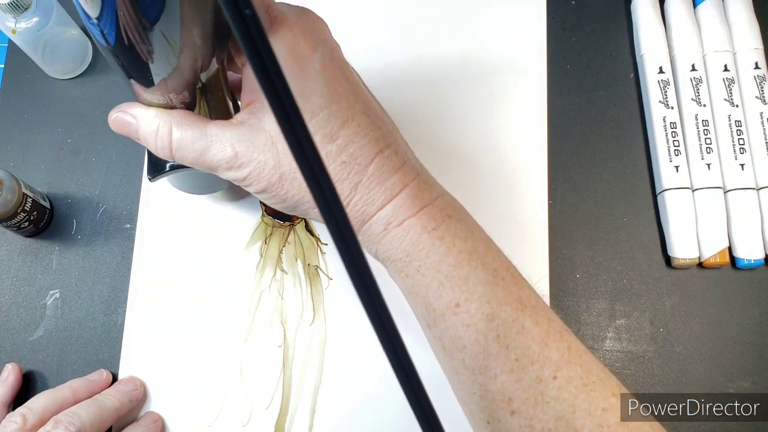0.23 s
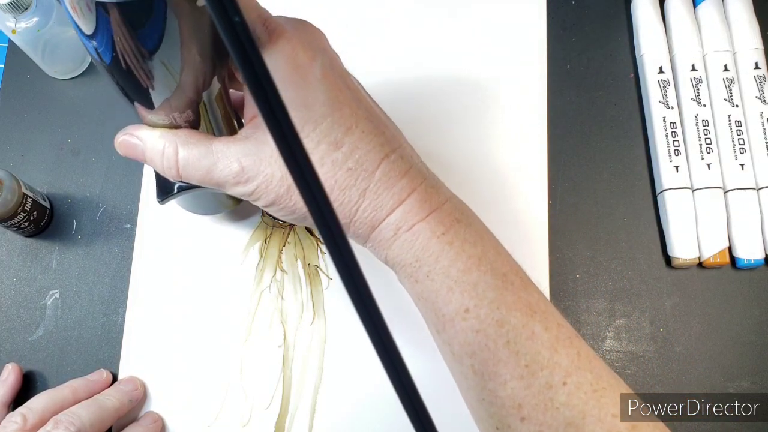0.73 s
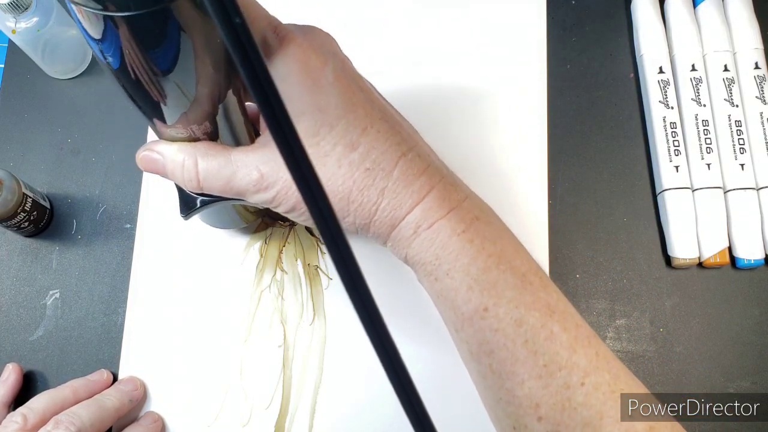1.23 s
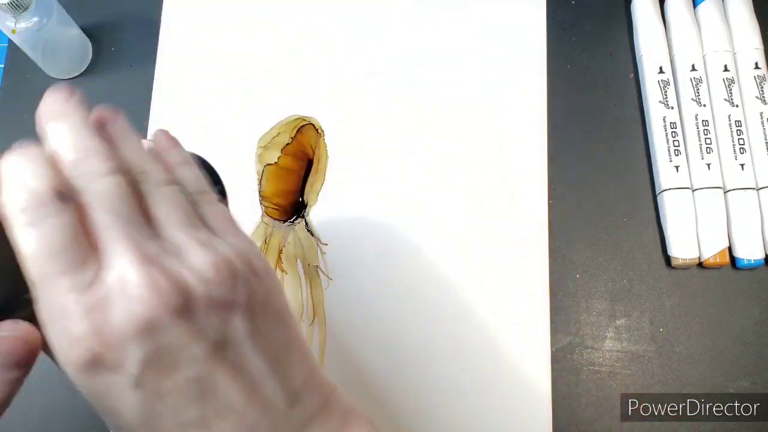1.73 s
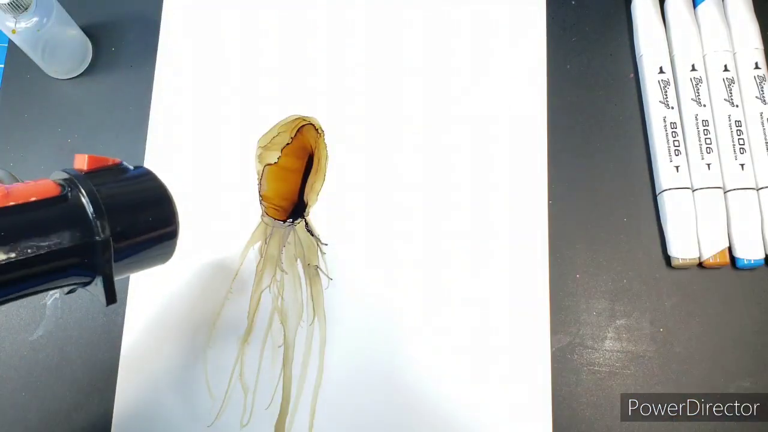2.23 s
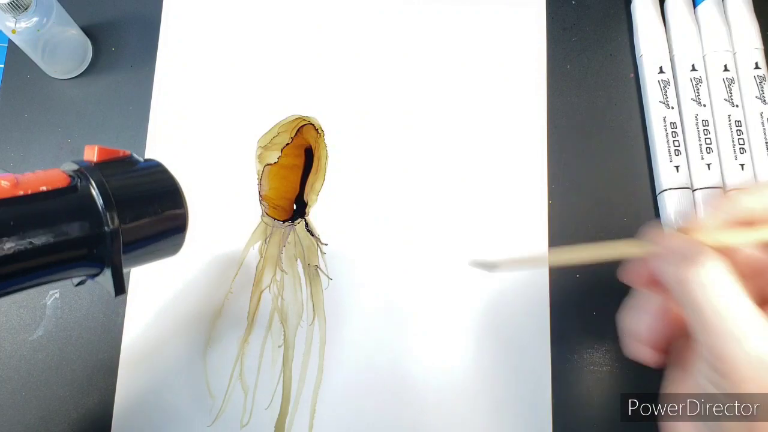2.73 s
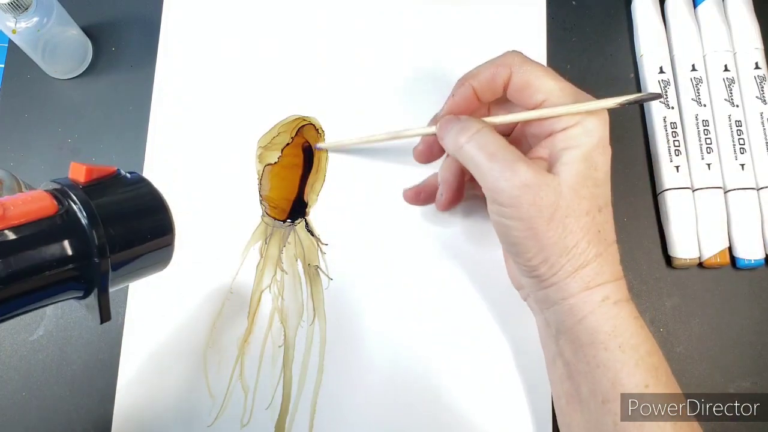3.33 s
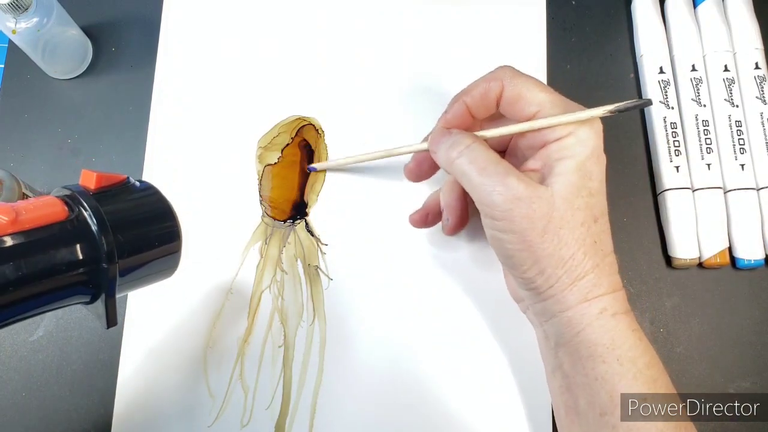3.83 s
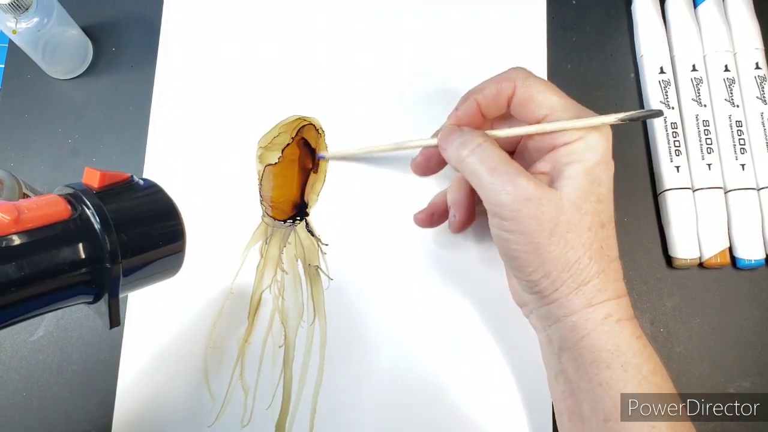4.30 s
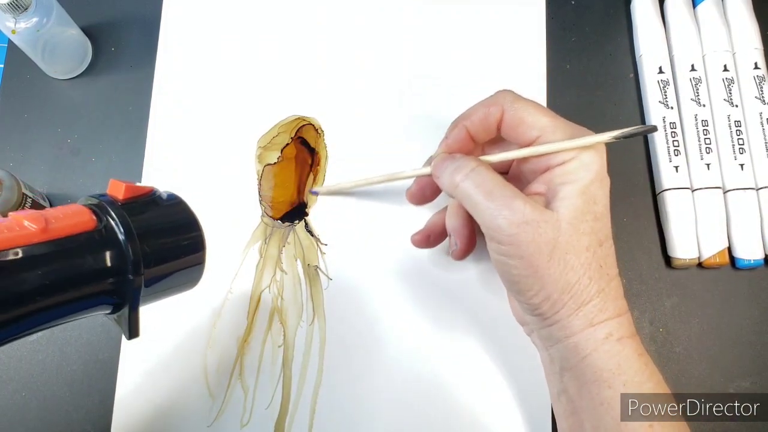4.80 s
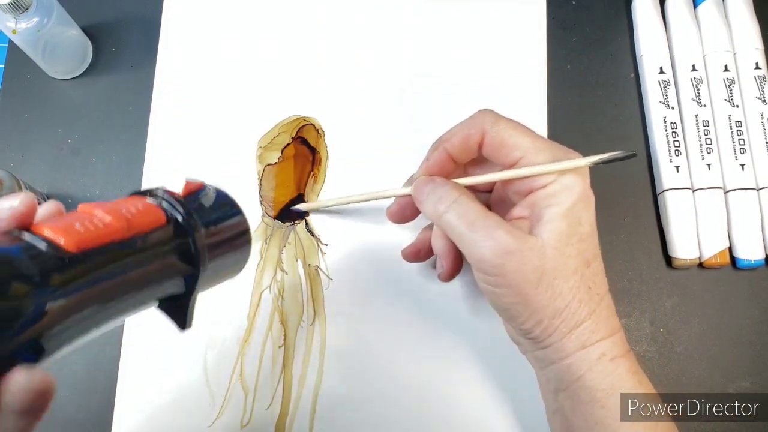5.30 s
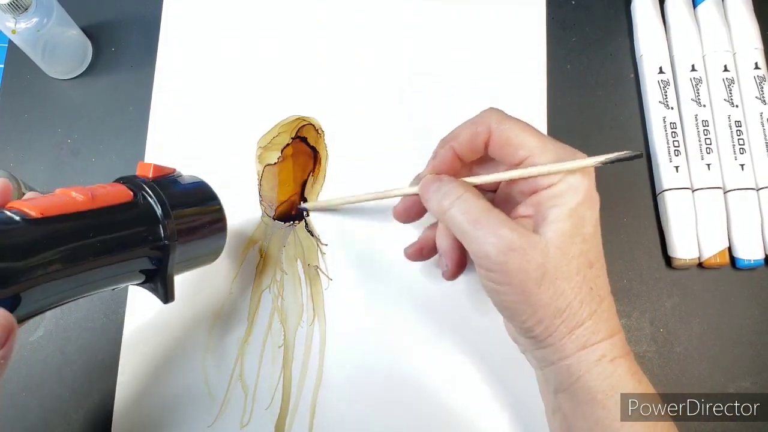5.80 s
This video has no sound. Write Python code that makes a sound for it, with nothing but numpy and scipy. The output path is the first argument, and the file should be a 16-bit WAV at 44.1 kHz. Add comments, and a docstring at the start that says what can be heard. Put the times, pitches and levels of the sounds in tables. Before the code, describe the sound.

Continuous close blow dryer noise in a small dry room: low barrel roar, dense airy hiss, and a reedy fan whine with a slight electrical buzz. The tone changes as the nozzle leaves the paper, with a soft sweep. Soon after come a light desk knock and a sharp wood-on-plastic tick, slightly to the right. The blowing continues to the end, with small flutters and another gentle sweep as it tilts.

```python
"""At a desk, a small hand-held dryer blows over a sheet of paper, close to a two-port microphone.
It points straight down at first, then is swung aside and later tilted up. Turbulent air roars in the
barrel and hisses at the nozzle, as shaped noise; the fan whines in sine tones on multiples of its shaft
speed, which ripples with the mains. A hand bumps the desk and picks up a paintbrush with one sharp click:
noise ticks over decaying desk modes."""
import sys
import numpy as np
from scipy import signal
from scipy.fft import rfft, irfft
from scipy.io import wavfile
from scipy.ndimage import uniform_filter1d, map_coordinates

SR = 44100
rng = np.random.default_rng(int(sys.argv[2]) if len(sys.argv) > 2 else 0)


def log_audio(samples):
    """Write samples as a 16-bit WAV file to the path given in sys.argv[1]."""
    # one column per channel
    frames = np.atleast_2d(samples).T
    # limit to full scale, then quantise
    limited = np.clip(frames, -1, 1)
    pcm = np.round(limited * 32767).astype(np.int16)
    wavfile.write(sys.argv[1], SR, pcm)


N = 266849

# turbulent air, base spectrum: (frequency [Hz], density pointing down [dB per Hz], aside [dB per Hz])
AIR_SPECTRUM = [(25, -99, -94), (38, -109, -104), (56, -73.5, -83), (95, -89, -89.5), (190, -88, -84.5),
                (282, -84, -86), (642, -82, -79.5), (1400, -85, -86), (2930, -79.5, -80.5),
                (3100, -82.5, -81.5), (4700, -85, -87.5), (6000, -84.5, -86), (9160, -86.5, -91),
                (13300, -89, -91.5), (15300, -83.5, -87.5)]
# resonances of barrel, grille and desk:
# (frequency [Hz], width [Hz], lift pointing down [dB], lift aside [dB])
RESONANCES = [(127.6, 39, 6, 5.5), (306, 65, 6.5, 8), (406.6, 13, 10, 12), (520, 75, 5.5, 4),
              (771, 64, 14, -1), (858.7, 111.6, 15.5, 22.5), (991, 193, 11.5, 1.5), (1061, 177, 2, 14),
              (1600, 444, 8, 4.5), (1756, 87, -1, 3.5), (2006, 78, 5.5, 5.5), (2310, 35, 8.5, 5.5),
              (3816, 113, -1.5, 11), (4830, 83, 5.5, 6), (7250, 680, 1, 5.5), (7830, 260, -1.5, 3.5),
              (8300, 210, -0.5, 4.5), (11400, 3900, 6.5, 7)]
# the colour of the air shifts as the hands move:
# (middle time [s], length [s], frequency [Hz], width [Hz], change [dB])
COLOUR_SHIFTS = [(2.54, 0.75, 640, 220, 4), (6.6, .8, 640, 170, 2.5), (3.8, 1.8, 894, 88, -5.5),
                 (3.5, .4, 2430, 180, 3.5), (5.1, 0.5, 2560, 350, -7), (3.7, 2.4, 3770, 400, -5),
                 (3.4, 0.32, 6800, 690, 1), (5.5, .3, 8100, 560, -3)]
# the roar of the barrel swells briefly: (time [s], half length [s], lift [dB])
ROAR_SURGES = [(.2, 0.47, 2), (1.78, 0.46, 2), (3.272, 0.14, 0.8), (4.65, 0.16, 0.5), (5.755, 0.3, 1.5)]
# the nozzle sweeps past the microphone:
# (time [s], half length [s], hiss lift averaged over the ports [dB], whine lift [dB])
NOZZLE_SWEEPS = [(1.626, 0.095, 2, 7), (5.337, 0.18, 1.5, 0.5)]
# the two ports in the bass, wherever the dryer points:
# (frequency [Hz], left minus right [dB], coherence [0-1], left leads by [rad])
PORTS_BASS = [(60, -4.5, 0.6, .24), (250, 1, 0.97, 0.15), (515, -0.6, 0.85, 0.28)]
# the two ports above the bass, same columns: dryer pointing down, aside, aside and tilted up
PORTS_DOWN = [(654, 0, 0.95, 1.4), (806, 6.5, 0.97, 2.12), (970, 6, 0.76, 0.86), (1190, 2.5, .7, 2.5),
              (1450, 3, 0.8, 1.06), (2000, 1.5, 0, 1), (2440, 1.5, 0.3, 3.1), (2560, .3, .65, 3.1),
              (2750, 0, .98, 3.12), (3020, 0, .97, 3.16), (3300, 1, .1, 4.5), (4300, 0, .42, 5.8),
              (5000, 1, .5, 6), (5600, 2, .4, 7), (6600, 1.5, .55, 9.4), (7200, 0, 0.5, 10.7),
              (8100, 4, 0.05, 12), (9250, 2.5, 0.16, 11.5), (11800, 2.5, 0, 12.3), (15000, 13, .08, 16)]
PORTS_ASIDE = [(693, -3, 0.67, 0.69), (782, 4, 0.9, 2.55), (1180, 7.5, 0.87, 2.19), (1370, -3, .6, 2.7),
               (1710, 6, 0.26, 2.4), (2060, -2, 0.55, 0.46), (2260, 8, 0.01, 4.1), (2900, -.5, .58, 3.2),
               (3300, -.5, .25, 2.9), (3700, -1.3, .8, 3.05), (4100, -1.5, .3, 3.3), (4450, 0, .75, 3.15),
               (4750, 1, .25, 4.4), (5400, .5, .45, 6.1), (6000, 0, .2, 6.5), (7300, 12, 0.2, 4.9),
               (7900, -8, 0.25, 6.1), (8300, 11, 0.5, 8.3), (9050, 4.5, 0.13, 7.3), (12000, 0, 0.14, 10),
               (14800, 10, .03, 9.1)]
PORTS_TILTED = [(694, -3, 0.8, 0.55), (760, 4.5, .85, 2.3), (1140, 2.5, 0.8, 2.4), (1400, -3, 0.7, 0.99),
                (1670, -5, 0.76, 1.4), (1980, 2, .3, 3.5), (2330, 16, 0, 2.6), (2700, -3, .5, 3),
                (3100, -1.5, .3, .8), (3750, 3.5, .45, 2.2), (4350, .5, .7, 3.1), (5050, 1.5, .45, 3.5),
                (5600, 2, .25, 5.3), (6300, 3, .42, 6.1), (7100, 3, 0.5, 8.3), (7800, 3, 0.6, 10),
                (8300, 0, .3, 11), (9100, 5, .35, 12), (12000, .5, 0.1, 11.5), (14800, 12, .03, 13)]
# short reflections into each port:
# (lag pointing down [ms], lag aside [ms], relative strength [ratio, negative = inverted])
PATHS_LEFT = [(.43, .41, .07), (.8, .81, .1), (.905, .95, -.1), (1.47, 1.49, -.08)]
PATHS_RIGHT = [(.56, .45, -.12), (.884, .895, -.1), (1.05, 1.02, .07), (2.28, 2.26, -.06)]
# multiples of the shaft speed at which fan and commutator sing: [ratio]
SHAFT_MULTIPLES = [1, 5, 6, 7, 8, 9, 10, 11, 14, 15, 16, 20, 23, 30, 35, 43, 44, 45, 47, 48, 51]
# their tones, in that order, before the whine trim:
# (level pointing down [dB], level aside [dB], left minus right [dB], left leads by [rad])
SHAFT_TONES = [(-68, -69, 1, .4), (-54, -53, 1, 2.6), (-63, -60, 6, 2.5), (-58, -46.5, 6, 2.3),
               (-64, -61.5, 1, 2.3), (-58, -55.5, 1, 2), (-55, -50.5, 4, 1.6), (-64, -68, 2, 2.8),
               (-57, -63, 5, -2.8), (-62, -59.5, 0, -2.7), (-66, -70, 0, -3.1), (-66, -65.5, -1, 1.6),
               (-74, -71, -2, 3.1), (-61, -64.5, 1, -.8), (-70, -71, 1, -1.6), (-69, -65, 7, -3),
               (-73, -67, 5, -1.1), (-76, -67, 4, -.9), (-68, -62, 6, -1), (-71, -68, 2, -1.3),
               (-67, -72, 4, .5)]
# knocks: (time [s], tick level [dB], desk thud level [dB])
KNOCKS = [(.85, -28, -70), (2.224, -50, -47), (2.234, -31, -37.5), (2.24, -30, -46), (2.247, -32, -60),
          (2.4182, -4.5, -44), (2.4196, -7.5, -70)]
# colour of the tick of hard wood on plastic: (frequency [Hz], relative level [dB])
TICK_COLOUR = [(1000, -22), (4000, -25.5), (5400, -20), (6200, -20.5), (7900, -13), (9400, -20),
               (10700, -5.5), (11700, -10), (12800, -7), (13400, -1.5), (14500, -1), (15300, -5),
               (16500, -17)]
# modes of the desk top: (frequency [Hz], relative level [dB], decay time t60 [s])
DESK_MODES = [(133, -9, 0.083), (200, -14, 0.08), (336, -0.5, 0.067), (417, 1.5, 0.22), (555, -17, 0.082),
              (850, 9.5, 0.041)]
# gliding whooshes of the moving nozzle:
# (time [s], half length [s], from [Hz], to [Hz], width [Hz], level [dB])
WHOOSHES = [(1.66, 0.19, 2300, 3900, 450, -55.5), (3.15, 0.12, 2100, 1627, 220, -52),
            (5.3, 0.18, 2300, 3070, 450, -52.5)]

TIME = np.arange(N) / SR  # s
FREQS = np.maximum(np.fft.rfftfreq(N, 1 / SR), 1)  # Hz
LEFT_RIGHT = np.array([[.5], [-.5]])  # splits a difference evenly between the ports
MAINS_HZ, TOP_HZ = 60, 15600
# extra lag of the right port over the whole swing, and from the unsteady hand
TURN_LAG_MS, TREMBLE_LAG_MS = 0.15, 0.007
THUD_RISE_S = 0.00077
TICK_T60_S, TICK_BALANCE_DB, TICK_LAG_S = .017, -7, .0002
ROOM_DB, ROOM_T60_S = -18, .165
RIPPLE_RAD = .02  # of shaft angle
# moves of the dryer, each by its middle and length: swing aside, quick lift off the paper, tilt up
SWING_S, SWING_LENGTH_S = 1.743, 0.77
LIFT_S, LIFT_LENGTH_S = 1.62, .3
TILT_S, TILT_LENGTH_S = 5.23, 0.47
# the motor runs evenly, sags a little as the dryer is swung, and slowly recovers
SHAFT_HZ, SAG_HZ = 166.75, 1.4  # even speed, greatest drop
SAG_S, SAG_ATTACK_S, SAG_HOLD_S, SAG_RELEASE_S = 1.5, .45, 1.15, 2.4
# level trims at full speed, and their change while the motor sags
ROAR_DB, HISS_DB, WHINE_DB = -0.5, 1.5, 0.67
HISS_SAG_DB, WHINE_SAG_DB = -0.36, -4.5
HUM_ASIDE_DB = -1.5  # change of the hum once the dryer is aside


def undb(db):
    """Logarithmic level: decibels to amplitude gain."""
    return 10 ** (np.asarray(db) / 20)


def spectra(table, at=FREQS):
    """Logarithmic frequency scale: each column of a table is joined by straight lines on a log axis."""
    hz, *columns = np.transpose(table)
    return [np.interp(np.log(at), np.log(hz), column) for column in columns]


def walk(rate):
    """Random modulation: smooth chance with a spread near 1, changing about rate times a second."""
    hold = int(SR / rate)
    steps = np.repeat(rng.standard_normal(N // hold + 2), hold)
    smooth = uniform_filter1d(uniform_filter1d(steps, hold), hold)
    return 1.3 * smooth[:N]  # restores the spread lost in smoothing


def ease(s, length):
    """Raised-cosine motion: one smooth move around a moment, from 0 to 1."""
    part = np.clip((TIME - s) / length + .5, 0, 1)
    return .5 - .5 * np.cos(np.pi * part)


def swell(s, half):
    """Gaussian envelope: a smooth rise and fall around a moment, 0-1."""
    return np.exp(-((TIME - s) / half) ** 2)


def band(x, hz, width):
    """Resonant filtering: the part of a sound around a centre frequency."""
    return signal.lfilter(*signal.iirpeak(hz, hz / width, fs=SR), x)


def delay(x, ms, order=1):
    """Propagation delay: a sound heard later by a lag that may move."""
    return map_coordinates(x, [(TIME - ms / 1000) * SR], order=order, mode="mirror")


def port_noise(ports):
    """Spatial coherence: noise of unit power per Hz, partly shared by the ports and partly their own."""
    balance_db, coherence, lead = spectra(PORTS_BASS + ports)
    shared, *own = rfft(rng.standard_normal((3, N))) * np.sqrt(SR / 2)
    gain = undb(balance_db * LEFT_RIGHT)
    gain /= np.sqrt(np.mean(gain ** 2, axis=0))  # mean power of the ports stays 1
    common = np.sqrt(coherence) * shared * np.exp(1j * lead * LEFT_RIGHT)
    separate = np.sqrt(1 - coherence) * np.array(own)
    return gain * (common + separate)


def turn(air, turned):
    """Interference: a turn or tremble changes the lag between ports, so the bands where they oppose glide."""
    lag_ms = TURN_LAG_MS * turned + TREMBLE_LAG_MS * walk(4.2)
    return np.array([air[0], delay(air[1], lag_ms, order=5)])


def reflections(hiss, aside, tremor=0.026, strength=1.1):
    """Comb filtering: desk, paper and hands return the hiss late; the combs slide as the dryer moves."""
    stretch = 1 + tremor * walk(2.99)
    heard = []
    for port, paths in zip(hiss, (PATHS_LEFT, PATHS_RIGHT)):
        echoes = 0
        for down_ms, aside_ms, share in paths:
            lag_ms = (down_ms + (aside_ms - down_ms) * aside) * stretch
            echoes = echoes + share * delay(port, lag_ms)
        heard.append(port + strength * echoes)
    return np.array(heard)


def airflow(aside, roar_db, hiss_db, split_hz=1500, beam_hz=6000, gust_db=0.5, flutter_db=0.94,
            lean=0.67, middle_share=0.28):
    """Turbulence and resonance: broadband noise rings the barrel; its colour follows the nozzle's aim."""
    down_db, aside_db = spectra(AIR_SPECTRUM)
    for hz, width, lift_down_db, lift_aside_db in RESONANCES:
        bell = 1 / (1 + (2 * (FREQS - hz) / width) ** 2)
        down_db = down_db + lift_down_db * bell
        aside_db = aside_db + lift_aside_db * bell
    down = irfft(port_noise(PORTS_DOWN) * undb(down_db), N)
    flat = irfft(port_noise(PORTS_ASIDE) * undb(aside_db), N)
    raised = irfft(port_noise(PORTS_TILTED) * undb(aside_db), N)

    # equal-power crossfades between the three aims
    tilted = ease(TILT_S, TILT_LENGTH_S)
    swung = np.sqrt(1 - tilted) * flat + np.sqrt(tilted) * raised
    air = np.sqrt(1 - aside) * turn(down, ease(LIFT_S, LIFT_LENGTH_S))
    air += np.sqrt(aside) * turn(swung, aside - 1)
    for s, length, hz, width, db in COLOUR_SHIFTS:
        air = air + (undb(db * ease(s, length)) - 1) * band(air, hz, width)

    spectrum = rfft(air)
    roar = irfft(spectrum / (1 + (FREQS / split_hz) ** 4), N)
    # the top of the hiss beams from the nozzle and swells most at the nearer, left port
    top = irfft(spectrum / (1 + (beam_hz / FREQS) ** 6), N)
    beam_db = sum(db * swell(s, half) for s, half, db, _ in NOZZLE_SWEEPS)
    beam_db = beam_db * (1 + lean * np.sign(LEFT_RIGHT))
    middle = (air - roar - top) * undb(middle_share * beam_db)
    hiss = middle + reflections(top * undb(beam_db), aside)
    return roar * undb(roar_db + gust_db * walk(16)) + hiss * undb(hiss_db + flutter_db * walk(11))


def motor_sag():
    """Motor slowing: how far the speed has sunk, 0-1, by a quick drop, a hold and a slow recovery."""
    corners = SAG_S + np.cumsum([0, SAG_ATTACK_S, SAG_HOLD_S, SAG_RELEASE_S])
    return np.interp(TIME, corners, [0, 1, 1, 0])


def shaft_angle(sag, wobble_hz=0.0471):
    """Phase modulation: a push once per mains cycle gives high tones side tones 60 Hz to either side."""
    speed_hz = SHAFT_HZ - SAG_HZ * sag + wobble_hz * walk(8)
    ripple = RIPPLE_RAD * np.sin(2 * np.pi * MAINS_HZ * TIME)
    return 2 * np.pi * np.cumsum(speed_hz) / SR + ripple


def whine(angle, aside):
    """Harmonic radiation: clean tones locked to the shaft, their levels changing as the dryer turns."""
    out = np.zeros((2, N))
    for multiple, (down_db, aside_db, balance_db, lead) in zip(SHAFT_MULTIPLES, SHAFT_TONES):
        size = (1 - aside) * undb(down_db) + aside * undb(aside_db)
        tone = np.sqrt(2) * size * np.sin(multiple * angle + lead * LEFT_RIGHT)  # levels are RMS
        out += tone * undb(balance_db * LEFT_RIGHT)
    return out


def brushes(angle, line_db=-74, spread_db=2, balance_db=3, spark=0.75, size=4096):
    """Periodic friction: the same rough track each turn makes a comb of treble lines, throbbing with mains."""
    multiples = np.arange(24, 94)  # of the shaft speed
    lines = np.zeros((2, size // 2 + 1), complex)
    chance = rng.standard_normal((2, len(multiples)))
    phases = np.exp(2j * np.pi * rng.random(chance.shape))
    lines[:, multiples] = undb(line_db + spread_db * chance) * phases
    tracks = irfft(lines) * size / np.sqrt(2)
    place = angle / (2 * np.pi) % 1 * size  # on the track
    scrape = np.array([np.interp(place, np.arange(size), track) for track in tracks])
    throb = 1 + spark * np.cos(2 * np.pi * MAINS_HZ * TIME)
    return scrape * undb(balance_db * LEFT_RIGHT) * throb


def hum(hum_db=-63.5, balance_db=-4, waver=0.47):
    """Amplitude and phase modulation: a low mains hum that wavers and fades in and out."""
    swing = 1 + waver * (walk(8) + 1j * walk(22))
    tone = np.sqrt(2) * np.real(swing * np.exp(2j * np.pi * MAINS_HZ * TIME))
    return tone * undb(hum_db + balance_db * LEFT_RIGHT)


def knocks():
    """Impact: a bright tick, nearer the right port, with a short room tail, over the modes of the desk top."""
    ticks, thuds = np.zeros((2, N)), np.zeros(N)
    age = TIME[:SR // 2]
    port_age = age - TICK_LAG_S * np.array([[1], [0]])  # the left port hears it later
    direct = (port_age >= 0) * undb(-60 * port_age / TICK_T60_S + TICK_BALANCE_DB * LEFT_RIGHT)
    room = undb(ROOM_DB - 60 * age / ROOM_T60_S)
    envelope = np.hypot(direct, room)
    thud = sum(undb(db - 60 * age / t60) * np.sin(2 * np.pi * hz * age) for hz, db, t60 in DESK_MODES)
    thud *= 1 - np.exp(-age / THUD_RISE_S)
    for s, tick_db, thud_db in KNOCKS:
        span = slice(int(s * SR), int(s * SR) + len(age))
        ticks[:, span] += undb(tick_db) * envelope * rng.standard_normal((2, len(age)))
        thuds[span] += undb(thud_db) * thud
    return irfft(rfft(ticks) * undb(spectra(TICK_COLOUR)[0]), N) + thuds


def whooshes(balance_db=3, own_share=0.38):
    """Moving resonance: the gap between nozzle and desk changes, so a breathy band of noise glides."""
    out = np.zeros((2, N))
    for s, half, from_hz, to_hz, width_hz, db in WHOOSHES:
        hz = from_hz + (to_hz - from_hz) * ease(s, 3 * half)
        lowpass = signal.butter(2, width_hz / 2, fs=SR, output="sos")
        noise = rng.standard_normal((3, N)) + 1j * rng.standard_normal((3, N))
        breath = signal.sosfilt(lowpass, noise)
        # complex noise around 0 Hz is carried up to the gliding frequency
        breath = np.real(breath * np.exp(2j * np.pi * np.cumsum(hz) / SR))
        mixed = np.sqrt(1 - own_share) * breath[0] + np.sqrt(own_share) * breath[1:]
        out += mixed / breath.std() * undb(db) * swell(s, half)
    return out * undb(balance_db * LEFT_RIGHT)


def scene():
    """Superposition: air, motor, hum and knocks add; hiss and whine ease while the motor sags."""
    aside, sag = ease(SWING_S, SWING_LENGTH_S), motor_sag()
    roar_db = ROAR_DB + sum(db * swell(s, half) for s, half, db in ROAR_SURGES)
    hiss_db = HISS_DB + HISS_SAG_DB * sag
    sweep_db = sum(db * swell(s, half) for s, half, _, db in NOZZLE_SWEEPS)
    whine_db = WHINE_DB + WHINE_SAG_DB * sag + sweep_db
    angle = shaft_angle(sag)
    air = airflow(aside, roar_db, hiss_db)
    motor = whine(angle, aside) * undb(whine_db) + brushes(angle) * undb(hiss_db)
    mains_hum = hum() * undb(HUM_ASIDE_DB * aside)
    return air + motor + mains_hum + knocks() + whooshes()


def record(dry):
    """Band limiting: the recorder cuts the top steeply with an elliptic low-pass."""
    lowpass = signal.ellip(10, .1, 80, TOP_HZ, fs=SR, output="sos")
    return signal.sosfilt(lowpass, dry)


dry = scene()
out = record(dry)
log_audio(out)
```